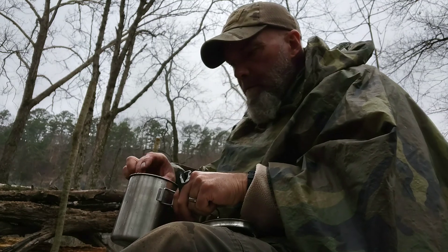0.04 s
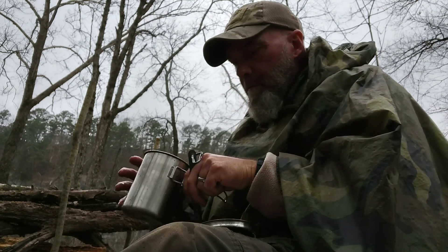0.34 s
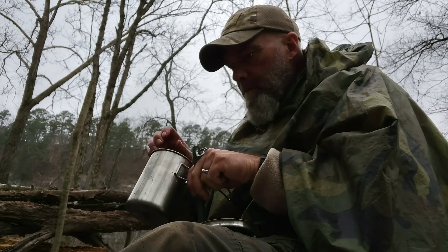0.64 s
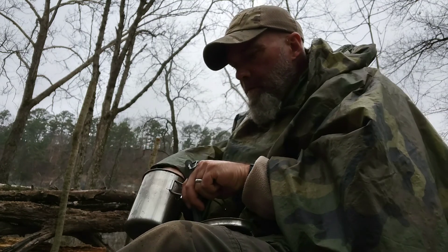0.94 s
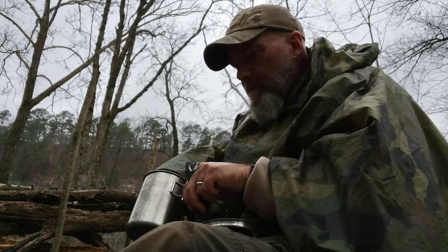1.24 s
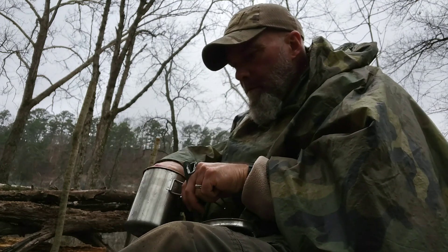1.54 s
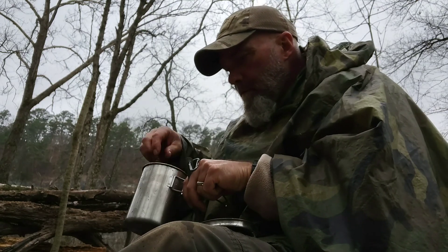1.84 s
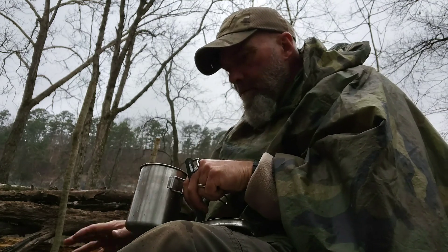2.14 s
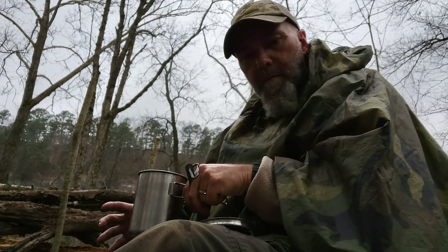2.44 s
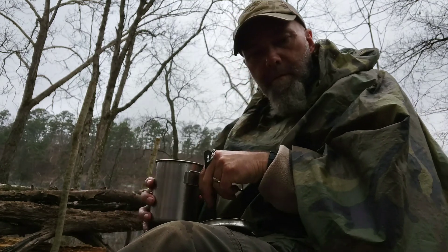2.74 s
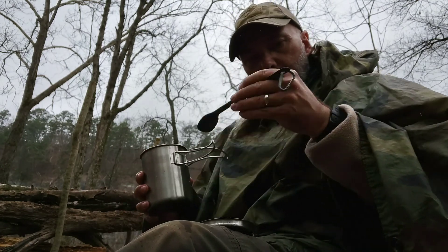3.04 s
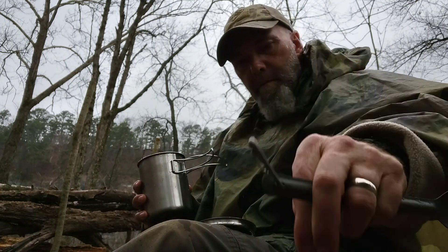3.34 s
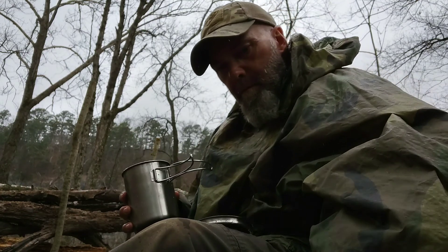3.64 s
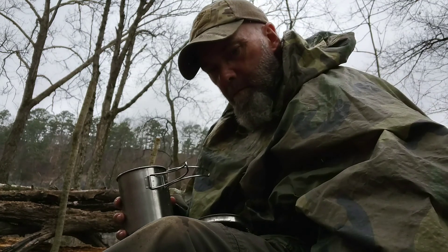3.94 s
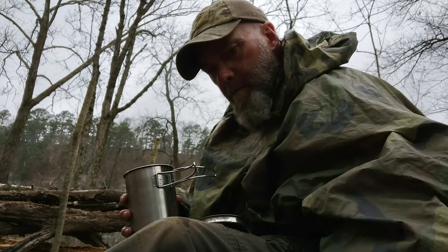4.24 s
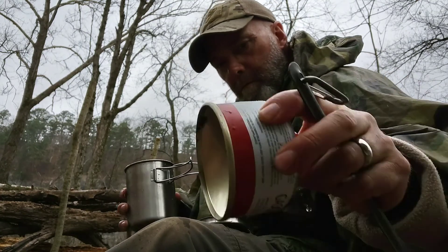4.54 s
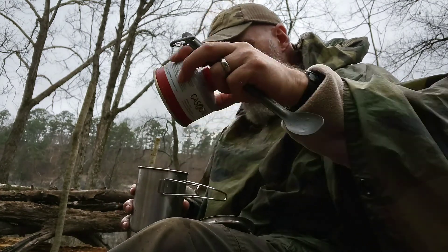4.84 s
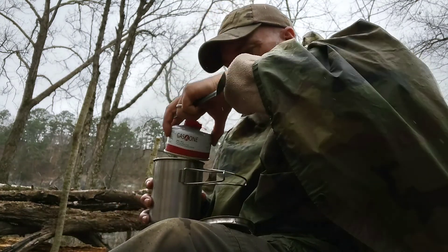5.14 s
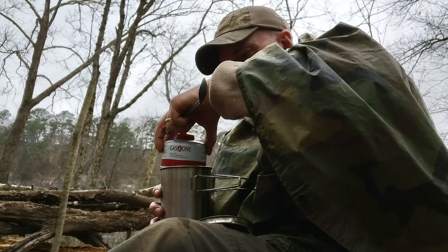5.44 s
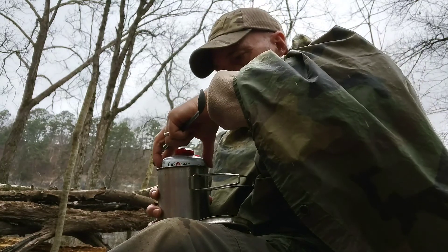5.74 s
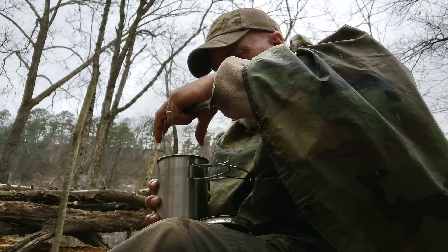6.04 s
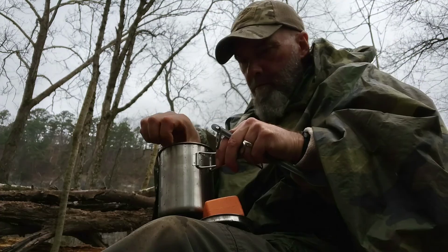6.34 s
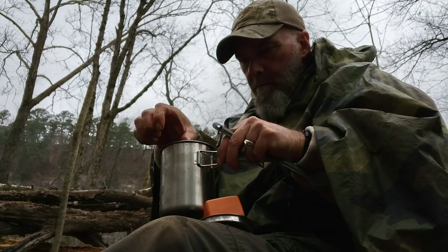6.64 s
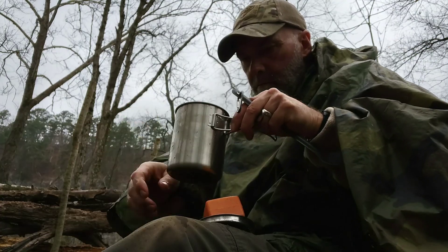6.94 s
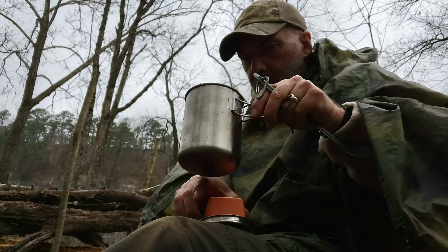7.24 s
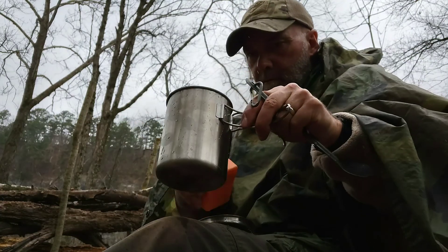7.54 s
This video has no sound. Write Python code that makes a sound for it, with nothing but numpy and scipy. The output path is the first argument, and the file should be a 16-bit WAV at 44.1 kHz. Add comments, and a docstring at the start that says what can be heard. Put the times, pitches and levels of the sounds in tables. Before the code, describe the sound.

A steel camping cup is knocked close to the microphone right at the start and rings briefly. From about 1 to 2 seconds come light ticks, small scrapes and clicks of its wire handle, then a soft touch near 2.8 seconds. Between 3.3 and 5.1 seconds a clip snaps against a spoon in two clusters of bright clicks, slightly left. At 5.3 seconds a gas canister knocks on the cup's rim, then scrapes down inside with a faint hum of squeezed air. It hits the bottom at about 6.1 seconds with the loudest ringing clatter, which cuts off abruptly. Handle clicks and soft dull taps follow until about 7.5 seconds. The handling sounds dry, with a rain poncho rustling faintly as the arms move. Behind it lies a low woodland murmur, and a distant small bird whistles during the first second and a half, around 5 seconds and near the end.

```python
"""Steel camping cup in quiet woods

Close to the microphone, a man in a rustling rain poncho handles a cup that rings until he grips it.
Its wire handle and a clip on a spoon click. A gas canister knocks on the rim, scrapes down inside,
squeezing out a hum of air, and hits the bottom. Far off a small bird sings over the woods' murmur."""
import sys
import numpy as np
from scipy import signal
from scipy.fft import rfft, irfft
from scipy.io import wavfile

SR = 44100
rng = np.random.default_rng(int(sys.argv[2]) if len(sys.argv) > 2 else 0)


def to_wav(s):
    """Save 16-bit WAV."""
    ch = np.atleast_2d(s).T  # columns
    pcm = np.round(np.clip(ch, -1, 1) * 32767)  # PCM
    wavfile.write(sys.argv[1], SR, pcm.astype(np.int16))


N = 334719
TIME = np.arange(N) / SR
AGE = TIME[:SR * 3 // 4]  # seconds since a blow

# spectrum of the steel's crowded upper modes: frequency_hz, level_db
CRASH_COLOUR = [(100, -28), (300, -21.5), (600, 3.5), (1100, -5), (2000, 0.5), (3400, 1.5), (4400, -2),
                (7500, -1), (10000, -5), (15500, -10.5)]
# knocks on the cup's covered mouth, by the palm and then the canister:
# start_s, air_hz, air_db, wall_db, upper_modes_db, crash_t60_s
MOUTH_KNOCKS = [(.111, 572, -19.5, -25, -14.5, .06), (5.2705, 553, -13, -16, 2.5, .07),
                (5.3465, 503, -8.5, -15, 1.5, .095), (5.524, 487, -20.5, -21.5, 11.5, .042),
                (5.553, 484, -20, -23.5, 6.5, .045), (5.642, 440, -55.5, -45, 18, .045),
                (6.116, 523, -9, -10, -8, .1)]


def undb(db):
    """Decibels to gain."""
    return 10 ** (np.asarray(db) / 20)


def fade(t, t60, hold_s=0):
    """Hold at 1, then lose 60 dB every t60 seconds."""
    return np.exp(-np.log(1000) * np.maximum(t - hold_s, 0) / t60)


def swell(peak_s, half_s):
    """Smooth rise to 1 and fall again."""
    return np.exp(-((TIME - peak_s) / half_s) ** 2)


def flicker(rate, db):
    """Random gain that changes about rate times a second."""
    knots = rng.standard_normal(N // 20)
    return undb(db * np.interp(TIME * rate, np.arange(len(knots)), knots))


def add(out, start_s, sound):
    """Mix a sound in at its start time."""
    i = max(int(start_s * SR), 0)
    out[:, i:i + sound.shape[-1]] += sound[..., :N - i]


def noise(size, colour, tilt_db=0, wide_hz=2600, width=1.0):
    """Stereo noise of rms 1, bass centred; colour lists frequency_hz, level_db; tilt is per octave."""
    hz = np.maximum(np.fft.rfftfreq(size, 1 / SR), 1)
    points_hz, db = np.transpose(colour)
    octaves_up = np.log2(np.maximum(hz, points_hz[1]) / points_hz[1])
    gain = undb(np.interp(np.log(hz), np.log(points_hz), db) + tilt_db * octaves_up)
    mid, side = rfft(rng.standard_normal((2, size)))
    side = side * width * hz / np.hypot(hz, wide_hz)
    x = irfft(gain * np.array([mid + side, mid - side]), size)
    return x / x.std()


def ring(modes, upper_db=0, scatter_db=1.5, centre_hz=720, wide_hz=3200):
    """Struck modes reach left and right out of step; each blow reweights those far from centre_hz."""
    hz, db, t60 = np.transpose(modes)
    scatter, lag, sign = rng.standard_normal((3, len(hz)))
    outlying = np.abs(np.log2(hz / centre_hz)) > .65
    gain = undb(db + outlying * (upper_db + scatter_db * scatter)) * np.where(outlying, np.sign(sign), 1)
    waves = np.exp(np.outer(2j * np.pi * hz - np.log(1000) / t60, AGE))
    phase_turn = np.exp(1j * lag * np.minimum(hz / wide_hz, 1) ** 2 * 1.3)
    return (np.array([gain * phase_turn, gain / phase_turn]) @ waves).imag


def radiate(x, corner_hz=350):
    """A small vessel hardly radiates bass."""
    return signal.sosfilt(signal.butter(4, corner_hz, btype="high", fs=SR, output="sos"), x)


def open_air(level_db=-67, handling_rise_db=5):
    """Steady low murmur of the woods, with a swell of handling rumble as the canister goes in."""
    colour = [(25, -19.5), (50, -14.5), (90, 2), (150, 0), (250, -5.5), (400, -14.5), (900, -14),
              (1600, -21), (3300, -19), (5000, -25.5), (10000, -33), (15500, -39)]  # spectrum of the murmur: frequency_hz, level_db
    murmur = noise(N, colour, wide_hz=130, width=.5)
    handling_db = handling_rise_db * swell(peak_s=6.1, half_s=1.6)
    return undb(level_db + handling_db) * murmur * flicker(5, .8)


def poncho(rest_db=-77, creases_per_s=6, crease_spread_db=3.5, crease_t60=.025):
    """Stiff cloth by the microphone hisses as the arms move; now and then a crease snaps over."""
    colour = [(150, -3), (400, -7.5), (1000, -4.5), (2500, -1), (5000, 0), (8000, -1), (12000, -7),
              (15500, -11)]  # spectrum of the rustle: frequency_hz, level_db
    sweeps = [(1.3, .2, -63), (1.87, .12, -71), (2.2, .14, -69), (3.0, .3, -67.5), (3.47, .25, -61),
              (4.64, .13, -59.5), (4.92, .2, -65), (5.2, .13, -55), (5.75, .35, -68), (6.6, .2, -69)]  # arm movements under the cloth: peak_s, half_length_s, level_db
    motion = undb(rest_db) + sum(undb(db) * swell(peak_s, half_s) for peak_s, half_s, db in sweeps)
    creases = np.zeros((1, N))
    for start_s in rng.uniform(0, N / SR, int(creases_per_s * N / SR)):
        add(creases, start_s, undb(crease_spread_db * rng.standard_normal()) * fade(AGE, crease_t60))
    return noise(N, colour) * motion * (flicker(25, 1.5) + creases) * flicker(500, 2.5)


def bird():
    """A distant bird's thin whistles glide quickly and then settle on their last pitch."""
    song = [(.042, "whistle", -62), (.19, "fall", -60), (.41, "flick", -59), (.485, "whistle", -58),
            (.645, "fall", -59.5), (.93, "whistle", -63), (1.185, "fall", -63), (1.546, "fall", -59.5),
            (4.33, "fall", -68), (4.778, "fall", -61), (5.225, "fall", -58), (7.212, "fall", -62),
            (7.489, "whistle", -64)]  # phrases as they are sung: start_s, phrase_name, level_db
    phrases = {"fall": [(0, .055, 3680, 3370, 0), (.056, .042, 3130, 2480, -2)],
               "whistle": [(0, .032, 2880, 2970, -1), (.043, .025, 3830, 3030, 0)],
               "flick": [(0, .028, 6000, 4650, -7), (.028, .025, 3400, 4570, 0)]}  # notes of each phrase: delay_s, length_s, start_hz, end_hz, level_db
    out = np.zeros((2, N))
    for start_s, phrase, db in song:
        for delay_s, length_s, start_hz, end_hz, note_db in phrases[phrase]:
            progress = np.linspace(0, 1, int(length_s * SR))
            hz = end_hz + (start_hz - end_hz) * (1 - progress) ** 2
            envelope = undb(db + note_db) * np.sin(np.pi * progress) ** 2
            add(out, start_s + delay_s, envelope * np.sin(2 * np.pi * np.cumsum(hz) / SR))
    return out


def cup_modes(rim):
    """The place of contact, from body (0) to rim (1), decides how strongly each mode is driven."""
    modes = [(385, -46.5, -20.5, .2), (560, -22.5, -30.5, .09), (680, -14.5, -23, .07),
             (754, -15, -19, .07), (887.3, -0.5, -1, 0.57), (1305, -35.5, -21, 0.66),
             (1439, -29, -19.5, 0.21), (1743, -26.5, -26, .5), (1855, -26.5, -34.5, .25),
             (2186, -24, -37.5, 0.39), (2500, -30, -32, 0.53), (2753, -29.5, -14.5, 0.51),
             (3359, -38.5, -21, .45), (3470, -23, -19.5, .55), (3670, -28.5, -12.5, .45),
             (4462, -31.5, -31.5, .35), (4491, -38.5, -20.5, 0.399), (4680, -36.5, -20, 0.68),
             (5362, -34.5, -30.5, 0.25), (5846, -38.5, -14, 0.26), (6610, -44.5, -29.5, 0.55),
             (6870, -38, -26, 0.34), (7300, -39, -23, .3), (7960, -39, -31, .25), (8100, -40.5, -30, .28),
             (8600, -36.5, -34, .12), (9750, -48, -34, .25), (12120, -40.5, -43.5, .14)]  # thin steel wall: pitch_hz, body_struck_db, rim_struck_db, t60_s
    hz, body_db, rim_db, t60 = np.transpose(modes)
    return np.transpose([hz, body_db + np.clip(rim, 0, 1) * (rim_db - body_db), t60])


def cup(contact_s=.0016, full_crash_t60=.12, crash_halving_db=35):
    """Each blow rings the wall and its crowded upper modes, until the hand closes and damps them."""
    # blows on the cup: start_s, ring_db, rim_fraction, crash_db, free_ring_s
    knocks = [(0.11, -7, 0.18, -30, 0.086), (0.122, -36, 0, -27.5, .07), (.2115, -23.5, 0.23, -62, 0.012),
              (.969, -44, 0.75, -50, .004), (0.999, -43, 0.5, -59, .006), (1.022, -41.5, 0.57, -52, .006),
              (1.046, -36, .5, -55, .004), (1.072, -38.5, 0.54, -54, .014), (1.118, -46, 0.35, -61, .018),
              (1.294, -31.5, 0.72, -46, .02), (1.31, -44, 0.6, -62, .25), (1.639, -31, 1, -43, 0.085),
              (1.684, -30, 0.95, -39, 0.045), (1.735, -29.5, 0.95, -34, 0.006),
              (1.986, -58, 0.59, -41, .015), (2.787, -58, 0.33, -54, .006), (2.816, -43, 0, -50, 0.003),
              (5.273, -17, 0.1, -42, .012), (6.098, -25, 0, -36, .015), (6.117, -6, 0, -16.5, 0.022),
              (6.131, -9.5, 0.05, -22, 0.018), (6.146, -8.5, 0.3, -18, 0.018),
              (6.19, -26, 0.15, -43, 0.005), (6.207, -9, 0, -45, .005)]
    out = np.zeros((2, N))
    for start_s, ring_db, rim, crash_db, free_s in knocks:
        # lighter touches favour the upper modes and crash more briefly
        upper_db = max(.22 * (-12 - ring_db), 1.5)
        crash_t60 = full_crash_t60 * 2 ** (ring_db / crash_halving_db)
        tone = undb(ring_db) * ring(cup_modes(rim), upper_db) * np.minimum(AGE / contact_s, 1)
        crash = undb(crash_db) * noise(len(AGE), CRASH_COLOUR) * fade(AGE, crash_t60)
        grip_t60 = .07 + .8 * free_s  # a hand that closes late also closes softly
        add(out, start_s, (tone + crash) * fade(AGE, grip_t60, hold_s=free_s))
    return out


def canister(contact_s=.0013, chatter_s=.0062, bounce_s=.0068, bounce_db=-6, landing_s=6.118):
    """Palm or canister knocks sound the damped wall and shut-in air; the landing rings the cup's floor."""
    wall_modes = [(600, -2.5, 0.016), (702.3, -4.5, 0.069), (750, -2, .055), (810, 0, .06),
                  (854.5, -3.5, .075), (895, -17, 0.22), (1590, -16, 0.059), (1803, -10.5, 0.034),
                  (2060, -8.5, 0.032), (2080, -16.5, .06), (2676, -7, 0.068), (2755, -9.5, 0.058),
                  (2980, -10, 0.06), (3145, -12.5, .07), (3340, -9.5, .055), (3465, -8.5, .055),
                  (3547, -6, 0.082), (3700, -16, .09), (5230, -15, .06)]  # canister and cup wall pressed together: pitch_hz, level_db, t60_s
    floor_modes = [(1870, -26, 0.31), (1846, -17.5, 0.15), (2465, -23, 0.19), (4480, -27.5, .11),
                   (5271, -16, 0.19), (7264, -19, .11), (10100, -28, 0.0974)]  # floor of the cup: pitch_hz, level_db, t60_s
    out = np.zeros((2, N))
    gripped = np.minimum(AGE / contact_s, 1) * fade(AGE, t60=.25, hold_s=chatter_s)  # hands damp the wall
    air_envelope = (1 - fade(AGE, t60=.035)) * fade(AGE, t60=.087, hold_s=chatter_s)
    for start_s, air_hz, air_db, wall_db, upper_db, crash_t60 in MOUTH_KNOCKS:
        air = undb(air_db) * np.sin(2 * np.pi * air_hz * AGE) * air_envelope
        crash = undb(wall_db + upper_db - 8.5) * noise(len(AGE), CRASH_COLOUR, tilt_db=-2)
        crash *= fade(AGE, crash_t60, hold_s=chatter_s)
        wall = undb(wall_db) * gripped * ring(wall_modes, upper_db)
        add(out, start_s, air + crash + wall)
        rebound = undb(wall_db + bounce_db) * gripped * ring(wall_modes, upper_db)
        add(out, start_s + bounce_s, rebound)
    # the canister comes to rest on the floor and stops its ring
    add(out, landing_s, undb(-1) * ring(floor_modes) * fade(AGE, t60=.08, hold_s=.06))
    return out


def thuds(relative_db=-29.5, t60=.14):
    """Each knock on the mouth also jolts the cup in the hand: a faint low thud."""
    colour = [(30, -20), (120, -3), (230, 0), (600, -20), (3000, -60)]  # frequency_hz, level_db
    out = np.zeros((2, N))
    for start_s, _, _, wall_db, _, _ in MOUTH_KNOCKS:
        add(out, start_s, undb(wall_db + relative_db) * noise(len(AGE), colour) * fade(AGE, t60))
    return out


def scrapes(edge_db=-18, hiss_db=1, wall_db=-7.5):
    """Fingers and canister slide on the steel in gritty strokes; the grit also rings the gripped wall."""
    strokes = [(0.227, .045, .04, -52), (1.138, .035, .015, -43), (1.752, .04, .07, -45.5),
               (1.975, .047, .04, -43), (5.5, .033, .02, -36), (5.615, .02, .015, -45.5),
               (5.646, .003, .085, -40), (5.965, .014, .06, -48), (6.06, .066, .06, -34),
               (6.125, .045, .062, -30.5), (6.4, .02, .035, -54), (6.748, .04, .04, -59.5),
               (7.336, .045, .07, -61)]  # sliding contacts: peak_s, rise_s, release_s, level_db
    colour = [(200, -10), (700, -4), (890, -7.5), (1100, -21.5), (2800, -9.5), (3550, 10.5), (4100, -7.5),
              (5300, 5), (6200, -1), (7600, 3), (11000, -6), (15500, -13)]  # spectrum of the friction: frequency_hz, level_db
    pressure = np.zeros(N)
    for peak_s, rise_s, release_s, db in strokes:
        from_peak = np.maximum((peak_s - TIME) / rise_s, (TIME - peak_s) / release_s)
        pressure += undb(db + edge_db * from_peak)
    grit = pressure * flicker(600, 4.8) * flicker(150, 2.1)
    wall = ring(cup_modes(rim=.29), upper_db=21) * fade(AGE, t60=.09)
    wall /= np.linalg.norm(wall[0])
    singing = signal.fftconvolve(grit * rng.standard_normal((1, N)), wall, axes=1)[:, :N]
    hiss = grit * noise(N, colour)
    return radiate(undb(hiss_db) * hiss + undb(wall_db) * singing, corner_hz=600)


def clicks(snaps, tilt_db, tilt_per_db, left_db, typical_db=-28, rise_s=.0015, t60=.038):
    """Small steel parts snap together: a bright crack with a thin ring."""
    colour = [(200, -41), (1400, -23.5), (2500, -16), (4700, -5), (6200, -2.5), (8500, 3.5), (10500, 2.5),
              (14000, -1), (16000, -11)]  # spectrum of the crack: frequency_hz, level_db
    modes = [(8636, -12.5, 0.046), (10140, -10.5, 0.046), (13100, -20, 0.079), (4695, -21, .03),
             (6230, -16.5, 0.02), (7480, -11.5, .03)]  # ring of a small steel part: pitch_hz, level_db, t60_s
    pan_db = np.array([[left_db], [-left_db]]) / 2
    envelope = np.minimum(AGE / rise_s, 1) * fade(AGE, t60)
    out = np.zeros((2, N))
    for start_s, db in snaps:
        bright_db = tilt_db + tilt_per_db * (db - typical_db) + .8 * rng.standard_normal()
        crack = noise(len(AGE), colour, bright_db, width=.91) * envelope
        tone = ring(modes, upper_db=2 * bright_db - 2.5, scatter_db=4)
        add(out, start_s, (crack + tone) * undb(db + pan_db))
    return radiate(out, corner_hz=1400)


def wire_handle():
    """The handle snaps in its hinge with a dull click, just right of centre."""
    snaps = [(1.046, -28), (1.175, -37.5), (1.397, -40), (1.735, -26), (6.379, -35.5), (6.45, -29.5),
             (6.466, -27), (6.581, -31)]  # snaps of the hinge: start_s, level_db
    return clicks(snaps, tilt_db=-8.5, tilt_per_db=0, left_db=-2)


def palm(level_db=-61):
    """Dry skin glides down the smooth outside of the cup: one soft, high swish."""
    colour = [(1000, -10), (3000, -10), (4200, -18), (7300, 0), (10000, -7), (15500, -13)]  # spectrum of skin on steel: frequency_hz, level_db
    return undb(level_db) * swell(peak_s=2.46, half_s=.11) * noise(N, colour)


def taps(t60=.06):
    """Fingers and kit make soft contacts that die without ringing."""
    touches = [(2.817, -47), (4.477, -56), (4.993, -45), (5.061, -50), (6.265, -44.5), (6.466, -41),
               (6.585, -45.5), (6.617, -45), (6.712, -51.5), (7.294, -51), (7.335, -52), (7.365, -54),
               (7.526, -49)]  # dull contacts: start_s, level_db
    colour = [(60, -7), (300, -25), (550, 0), (880, 9), (1300, -6), (3000, -6), (6000, -16), (15000, -31)]  # spectrum of a tap: frequency_hz, level_db
    out = np.zeros((2, N))
    for start_s, db in touches:
        add(out, start_s, undb(db) * noise(len(AGE), colour) * fade(AGE, t60))
    return out


def spoon_clip():
    """The clip snaps on the spoon, a little to the left; harder snaps are brighter."""
    snaps = [(3.302, -38), (3.3205, -25), (3.410, -18.5), (3.562, -28.5), (3.574, -27.5), (3.58, -28),
             (3.645, -28), (3.723, -49), (3.808, -38.5), (4.036, -44), (4.533, -42.5), (4.631, -29.5),
             (4.639, -23), (4.737, -21), (4.761, -28), (4.855, -30.5), (4.877, -18.5), (5.125, -32.5),
             (5.838, -47)]  # snaps against the spoon: start_s, level_db
    return clicks(snaps, tilt_db=-.3, tilt_per_db=.17, left_db=4)


def trapped_air(rim_hz=475, deep_hz=272, sink_start_s=5.61, sink_time_s=.05, attack_s=.015, t60=.4):
    """Air squeezed past the canister hums at each shove, sinking in pitch as the gap lengthens."""
    shoves = [(5.635, -52), (5.838, -52), (5.955, -47)]  # pushes that drive the canister down the cup: start_s, level_db
    flow = np.zeros((1, N))
    for start_s, db in shoves:
        add(flow, start_s, undb(db) * np.minimum(AGE / attack_s, 1) * fade(AGE, t60))
    hz = deep_hz + (rim_hz - deep_hz) * np.exp(-np.maximum(TIME - sink_start_s, 0) / sink_time_s)
    hum = np.sin(2 * np.pi * np.cumsum(hz * flicker(140, .98)) / SR)
    return flow * hum * flicker(70, 1.9)


def trees(x, rise_s=.02, t60=.55):
    """Scattered echo from the trunks, duller than the direct sound."""
    colour = [(100, 3.5), (1000, .5), (4000, -4), (15000, -9.5)]  # frequency_hz, level_db
    tail = noise(len(AGE), colour, wide_hz=300) * fade(AGE, t60) * np.minimum(AGE / rise_s, 1)
    tail /= np.sqrt(np.sum(tail ** 2) / 2)
    return signal.fftconvolve(x, tail, axes=1)[:, :N]


def scene(cutoff_s=6.212, near_echo_db=-44, far_echo_db=-3.5):
    """Handling at the microphone is almost dry; the far song returns from the trunks nearly as loud."""
    # the steel's ringing cuts off abruptly just after the last knock
    steel = radiate((cup() + canister()) * fade(TIME, t60=.006, hold_s=cutoff_s))
    snaps = spoon_clip() + wire_handle()
    near = steel + snaps + thuds() + taps() + scrapes() + trapped_air() + poncho() + palm()
    song = bird()
    return near + undb(near_echo_db) * trees(near) + song + undb(far_echo_db) * trees(song) + open_air()


def record(dry, ceiling=1.1, top_hz=15900):
    """The recorder rounds the loudest peaks and cuts the highest treble."""
    rounded = ceiling * np.tanh(dry / ceiling)
    return signal.sosfilt(signal.ellip(8, .2, 70, top_hz, fs=SR, output="sos"), rounded)


dry = scene()
out = record(dry)
to_wav(out)
```